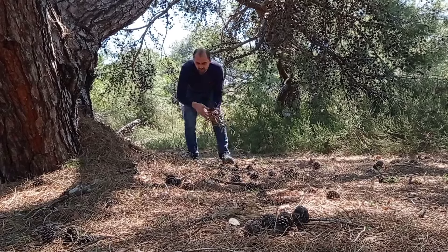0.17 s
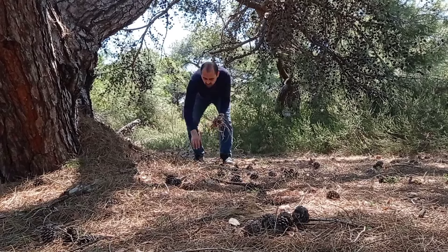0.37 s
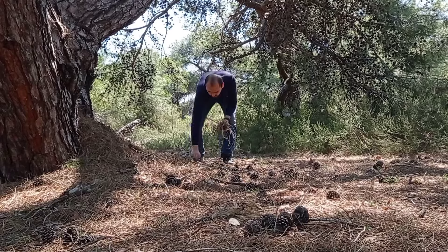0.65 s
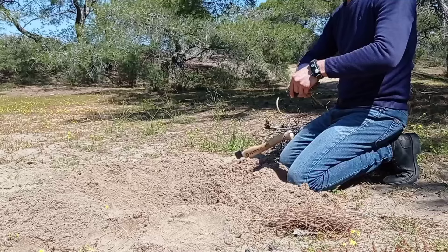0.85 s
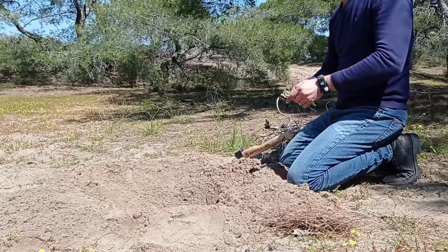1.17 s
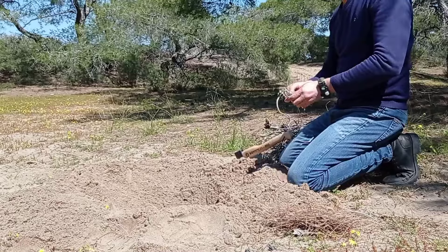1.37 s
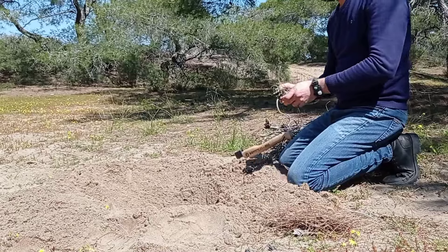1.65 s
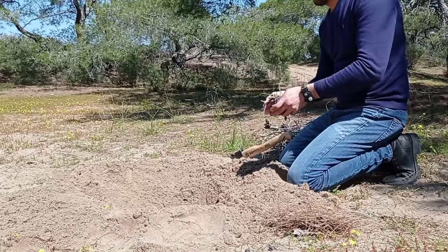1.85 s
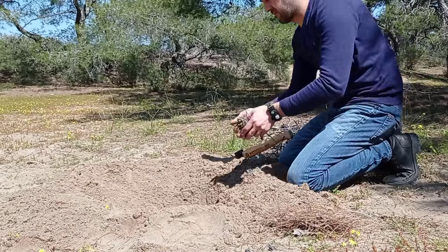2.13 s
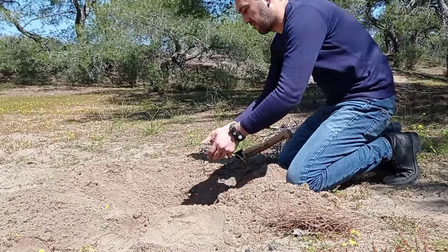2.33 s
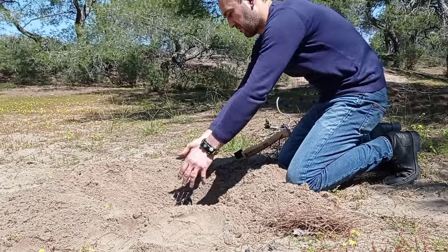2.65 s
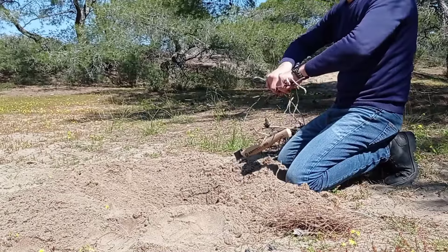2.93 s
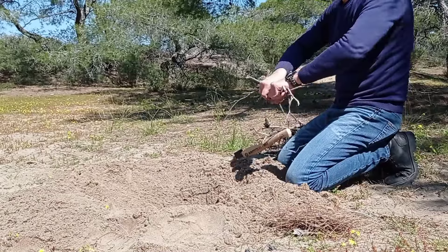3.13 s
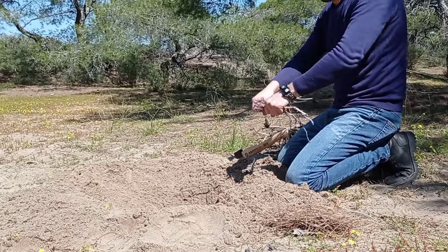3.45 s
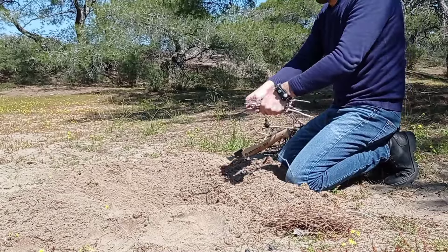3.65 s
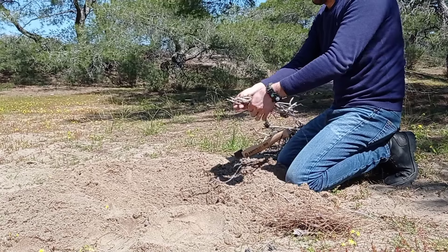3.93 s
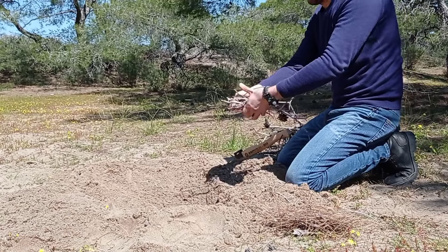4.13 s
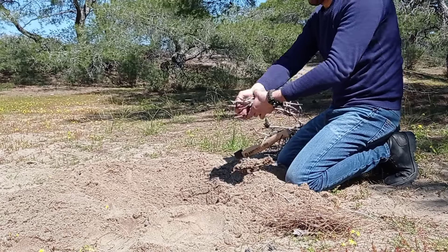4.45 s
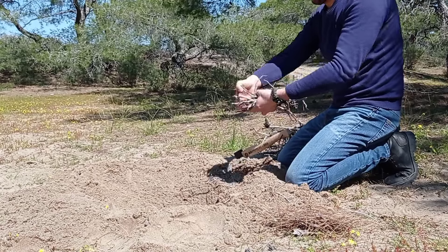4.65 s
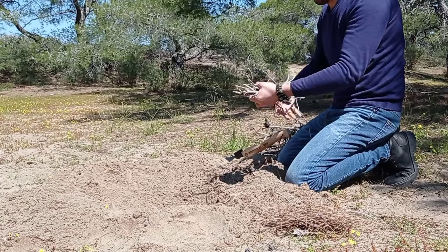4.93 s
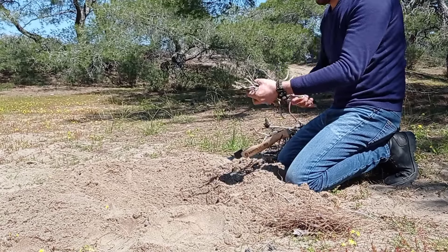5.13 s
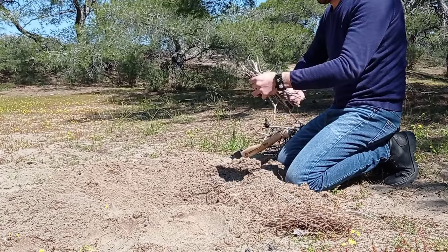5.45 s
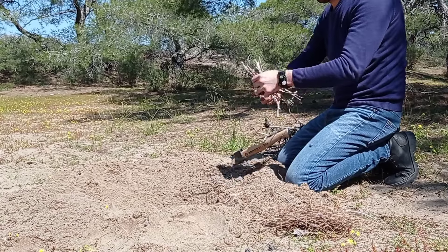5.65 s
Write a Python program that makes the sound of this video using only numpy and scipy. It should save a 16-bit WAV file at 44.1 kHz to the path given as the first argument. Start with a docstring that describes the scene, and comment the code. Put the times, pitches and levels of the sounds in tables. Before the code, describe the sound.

Outdoors among pines, hands crush dry twigs a few steps from the microphone. Faint ticks come first, then a cluster of snaps just after one second. A fly buzzes past near two seconds, then the loudest burst of bright cracks arrives just after three. Sparser crackles follow, with a late sharp snap. Low wind rumbles and thumps on the microphone throughout.

```python
"""Dry twigs and pine litter are crushed and snapped by hand in a wood, a few steps from the microphone.
Snaps are short noise bursts with a ringing piece; litter is a flurry of decaying sine clicks over a rustle.
A fly passes as a wavering tone with overtones. Wind buffets and thumps the microphone as filtered noise
and single pulses; the pines hum and far leaves hiss as patchy noise. Twice the sound drops out briefly."""
import sys
import numpy as np
from scipy import signal
from scipy.fft import rfft, irfft, next_fast_len
from scipy.io import wavfile
from scipy.ndimage import uniform_filter1d, map_coordinates

SR = 44100
rng = np.random.default_rng(int(sys.argv[2]) if len(sys.argv) > 2 else 0)


def persist_wave(psi):
    """Save psi, clipped to +-1, as 16-bit WAV."""
    counts = np.round(np.clip(psi, -1, 1) * 32767).astype(np.int16)
    wavfile.write(sys.argv[1], SR, np.atleast_2d(counts).T)


N = 255339


# the louder snaps of twigs; the three shares are relative to the crack:
# (time [s], crack level [dB], thick-wood knock [dB], stalk [dB], splinter fizz [dB], ringing piece [Hz])
LOUD_SNAPS = [(0.0385, -57, -21, -16, -16, 6940), (0.1926, -48.5, -13.5, -7, -7, 6500),
              (0.221, -50.5, -16.5, -10.5, -3, 6120), (0.4654, -63.5, -10.0, -6, 8, 7350),
              (0.4855, -50, -5.5, -2, -12, 7350), (0.7495, -48, -25.5, -20, -10, 5880),
              (0.7654, -56, -7, -6, -2, 4950), (0.9495, -54.5, -32, -19, -11, 6800),
              (0.9711, -51.5, -12, -8, -0.5, 6560), (1.0229, -32, 0.5, 5, -4.5, 2520),
              (1.0332, -42, -4, 1.5, -1, 4290), (1.045, -33.5, -21, -5, -10, 6740.0),
              (1.058, -39.5, -10.5, -8.0, 0, 6610), (1.109, -61, -17, 8, 2, 4880),
              (1.142, -36.5, 9.5, 5.5, 2.0, 2100), (1.16, -29.5, -5.5, 2, -2.0, 2570),
              (1.1892, -30.5, -9, 1, -5, 5040), (1.203, -42, -25, 2, 0.5, 5100.0),
              (1.228, -51, -17.5, 4, -9, 5550), (1.2416, -47, -5, 3.5, -10, 5530),
              (1.2975, -64, -16, 4.5, -11, 5270), (1.368, -57, -18.5, -12.5, 1, 6560),
              (1.4095, -44.5, -26.0, -14.0, -6, 5790), (1.4562, -48.5, -6.5, -2.5, -15, 4160),
              (1.5007, -36.5, -25, -19, -4.5, 6580), (1.5171, -54, -16, -4.5, -3.5, 5700),
              (1.5273, -48, -26, -5, -5, 5000), (1.5441, -46, -23, -18.5, -4.5, 6200),
              (1.588, -42, -32.5, 2.5, -13.0, 4700), (1.6555, -43.0, -30, -18, -4.5, 6430),
              (1.6912, -46.5, -14, -9, -14, 6360.0), (1.7703, -49.5, -21, 1.5, -10, 5600),
              (1.7874, -52, -9, -2, -13, 4810), (1.845, -47, -11, -19, -11, 6740),
              (1.8887, -57, -3.5, 5.5, -18.5, 6170), (1.9038, -46, -11.5, -2, -10, 6940),
              (1.954, -45.5, -7, -17, -16, 6200), (2.081, -53.5, -26, -22, -17, 7090),
              (2.7534, -42.5, -9, -9.5, -4, 5970), (2.7657, -48, -6, 2.5, -5, 6500),
              (2.7753, -30.5, -4, 2.5, -2.5, 6180), (2.819, -45, -8, -1.5, -16, 6920),
              (2.8368, -34.0, -7.5, 3, -6.5, 6660), (2.9015, -39.5, -16.5, -6, -7, 4240),
              (2.932, -37.5, -8, -11, 0, 7580), (2.9426, -34, -17, 0, -4, 6460),
              (2.9506, -37, 1.5, 5.5, 0, 2970), (3.0105, -48, -26, -13, 0.5, 7800),
              (3.033, -36, -14.5, -11, -3.0, 6700), (3.0546, -52.0, -7, -4.5, -11.0, 7040.0),
              (3.1034, -30, -14, -4, -10.0, 6490), (3.1198, -46, -16, -3, -14.5, 6940),
              (3.135, -23, -10.5, 1, -4, 3930), (3.1614, -34, -17, 2.5, -6, 4350),
              (3.1811, -25.5, -11, -3, 0, 7240), (3.19, -34.0, -24, -12, -8.5, 6530),
              (3.2032, -49, -18.0, -8.5, -3.5, 6700.0), (3.2207, -25.5, -13, -10, -16.5, 6860),
              (3.2274, -20.5, -14, -6.5, -4.5, 6560), (3.2328, -31, -13, -4, -6, 6600),
              (3.2473, -35.5, -13.5, -13.0, 4.5, 6700), (3.269, -22.5, -9.5, -1, -7.5, 7420),
              (3.3058, -25, -9, -2.5, -4.0, 6230.0), (3.3312, -28.5, -9.5, -21, -5, 6720),
              (3.3442, -30.0, -3, -5, -6, 5880.0), (3.3533, -28, -13, 1, -13, 6680.0),
              (3.3615, -36, -13.0, -5.5, -5.5, 7500), (3.3824, -17, -3, 4, -1.5, 7170),
              (3.4373, -35, -7, 0, -13, 6640), (3.4775, -58, -14, 1, -10, 5620),
              (3.5855, -65, 9.5, 8.5, -17, 2110), (3.6182, -48.5, -16, -3, -9, 5800.0),
              (3.629, -27.5, -5.5, -8, -8, 6360), (3.6392, -37.5, -4.0, 3.5, 0.5, 4060),
              (3.6623, -59.5, 8, 4, -12.0, 2580.0), (3.7167, -55, -14, 1, -12, 4580),
              (3.742, -50, -12, 1.5, -18, 4380), (3.7616, -59.5, -1.5, 8, 0, 2930),
              (3.874, -45.5, -34, -12, -5.5, 5230), (3.8814, -45.5, -21, -5, -12, 5300),
              (3.9622, -37, -33, -14, -5.0, 5290.0), (3.968, -41, -21, -1, -18, 6430),
              (3.9838, -34.5, -5, -11, -5.5, 6530), (3.9907, -31.5, -20, -7, -11, 6760),
              (4.038, -51, -9.5, 3, -0.5, 6180), (4.0513, -38, -14.5, -12, 0, 6050),
              (4.072, -33.0, -10.5, -14, -5, 6060), (4.1607, -39.5, -23, -19, -1, 6560),
              (4.2046, -57, -19, -7.5, -11, 6740), (4.336, -49.5, -14, -11.5, -0.5, 6800),
              (4.3838, -37.5, -10, -14, -8.5, 5280), (4.4203, -59, -13, 1, -17.0, 4920),
              (4.4574, -42.5, -21, 2, -1, 4960), (4.5184, -46.0, -12.0, -5.5, -20, 6130.0),
              (4.5286, -42.5, -15, -7.0, -5.5, 7120), (4.5474, -54, -6.5, -8, -20.5, 6470),
              (4.5691, -49, -20, 3.5, -12, 3540), (4.5789, -50, -22, -3, -6, 6500),
              (4.5909, -46.5, -16, -3, -14.5, 6500), (4.6983, -43, -23, -3, -13, 7520),
              (4.7076, -49.5, -13, -12.5, -17.5, 6730.0), (5.0088, -53.0, -20.0, -1, -18.5, 7100),
              (5.0907, -54, -10.5, -12, 1.5, 5960), (5.1144, -55.5, -18, -18, -15, 7670),
              (5.2001, -57.5, 8, 8.5, -0.5, 3090), (5.2116, -53.5, -4, 2, -12, 3810.0),
              (5.2654, -32, -12.5, -4, -5.5, 5360), (5.3166, -53, -3.0, 4, -15, 2440),
              (5.348, -43.5, -10, 1, -11, 6560), (5.379, -50, -28, -11.5, -1, 7230),
              (5.388, -46.5, -35, -14.5, 4, 7260), (5.4094, -25.5, -7.5, -35, -4, 5200),
              (5.4332, -37.5, -8.5, -10, -4.5, 1740.0), (5.6822, -51.5, -12, 3.5, -4.5, 5880),
              (5.7186, -49, -32, -11.0, -5, 5630.0), (5.7519, -38.5, -28, -3, -6.5, 4830),
              (5.7855, -41.5, -9, 1, 3, 4830)]
SNAP_T60_S, RING_T60_S, RING_DB = 0.014, 0.011, -3  # fibres tearing, the ringing piece


def snaps():
    """Each break is a sharp burst that dies in milliseconds and leaves one piece ringing at its own pitch."""
    t = np.arange(SR // 16) / SR
    tracks = np.zeros((4, N + len(t)))  # crack, knock, stalk, fizz
    rings = np.zeros(N + len(t))
    rise = 1 - np.exp(-(t / 0.00048) ** 2)
    crack_decay = amp(-60 * t / 0.0037)
    tearing_decay = 0.53 * amp(-60 * t / SNAP_T60_S)
    faint_tail = amp(-24.5 - 60 * t / 0.059)
    shape = rise * (crack_decay + tearing_decay + faint_tail)
    for s, db, knock_db, stalk_db, fizz_db, ring_hz in small_snaps() + list(LOUD_SNAPS):
        start = round(s * SR)
        burst = shape * rng.standard_normal(len(t))
        burst *= np.linalg.norm(shape) / np.linalg.norm(burst)  # each break has the strength of its row
        burst[round(0.0007 * SR)] += 1.64 * rng.choice([-1, 1])  # the fibres part in one instant
        shares_db = np.array([[0], [knock_db], [stalk_db], [fizz_db]])
        tracks[:, start:start + len(t)] += amp(db + shares_db) * burst
        # the piece rings as loud as the part of the wood its pitch belongs to
        part_db = knock_db if ring_hz < 2800 else stalk_db if ring_hz < 5000 else 0
        ring = amp(db + part_db + RING_DB - 60 * t / RING_T60_S) * np.sin(2 * np.pi * ring_hz * t)
        rings[start:start + len(t)] += rise * ring
    return wood(*tracks[:, :N]) + rings[:N]


# average shares of a small snap, relative to its crack: (knock [dB], stalk [dB], fizz [dB])
SMALL_SHARES = [-11.5, -4.5, -16]
SMALL_OVER_DB, SMALL_SPREAD_DB = 11, 1  # over the crackle they come from, random spread


def small_snaps(count=60):
    """Chance snaps come while the hand is busy, as rows like the louder ones."""
    level = grip()[0]
    busy = np.cumsum(np.sqrt(level) * (level > amp(-80)))
    draw = rng.standard_normal((count, 4))
    when, pitch = rng.random((count, 2)).T
    at = np.searchsorted(busy, when * busy[-1])
    db = np.minimum(20 * np.log10(level[at]) + SMALL_OVER_DB, -45) + SMALL_SPREAD_DB * draw[:, 0]
    shares_db = SMALL_SHARES + 5 * draw[:, 1:]
    ring_hz = 4200 + 3200 * pitch
    return list(np.column_stack([at / SR, db, shares_db, ring_hz]))


SMOOTH_DB, GRAINY_DB = -82.5, -65.5  # soft handling mostly rustles, hard squeezes click


def crackle(count=16000, size=192):
    """Needles and bark give way in flurries of tiny clicks over a patchy rustle of rubbing litter."""
    level, knock, stalk, fizz = grip()
    when, pitch, life, loud, turn = rng.random((count, 5)).T
    press_db = 4.5 * wobble(90) + 2.0 * wobble(250)  # the grip tightens and slips
    busy = np.cumsum(amp(press_db))
    start = np.searchsorted(busy, when * busy[-1])
    hz = (900 + (16000 - 900) * pitch)[:, None]
    t60 = (0.001 * 5 ** life)[:, None]  # 1 to 5 ms
    t = np.arange(size) / SR
    click_db = -3 * np.log(loud + 0.003)[:, None]  # many faint, few loud
    envelope = amp(click_db - 60 * t / t60) * (1 - np.exp(-t / 0.0002))
    rows = envelope * np.sin(2 * np.pi * (hz * t + turn[:, None]))
    places = start[:, None] + np.arange(size)
    clicks = np.bincount(places.ravel(), rows.ravel(), N + size)[:N]
    hard = np.clip((20 * np.log10(level) - SMOOTH_DB) / (GRAINY_DB - SMOOTH_DB), 0.2, 1)
    rustle = amp(0.6 * hard * press_db) * rng.standard_normal(N)
    mix = hard * unit(clicks) + np.sqrt(1.5 - hard ** 2) * unit(rustle)
    litter = patchy(mix, depth_db=3.0)
    return wood(level * litter, knock * litter, stalk * litter, fizz * litter)


# squeezes of the hand and steps on litter; the three shares are relative to the crackle:
# (start [s], hold [s], crackle level [dB], thick wood [dB], stalk [dB], splinter [dB])
HAND_SQUEEZES = [(0.014, 0.04, -68.5, -11.5, -14, -6.5), (.11, 0.23, -72.5, -15.5, -2, -30),
                 (0.473, .05, -72.5, -12, -8, -28), (0.602, 0.057, -80, -23, -17.5, -19),
                 (.7, 0.055, -73, -26, -18, -18), (0.802, 0.028, -72.5, -31, -14, -24),
                 (0.878, .03, -73, -21.5, -15, -8.5), (0.975, 0.0046, -74, -8, -11, -6),
                 (1.049, 0.01, -60.5, -15, 0.5, -3), (1.127, 0.033, -69, -23, -7, -6),
                 (1.144, .09, -60, -8, -1.5, -6.5), (1.37, 0.043, -66.5, -10.5, -15, -8.5),
                 (1.459, .18, -69, -14, -1, -5.5), (1.685, 0.041, -66, -8, 2, -8),
                 (1.774, 0.09, -76, -10.5, -4, -13), (1.886, .09, -70.5, -7, 0, -11),
                 (2.08, 0.092, -79, -3, 4, -13), (2.769, 0.023, -57.5, -5.5, -10.5, -3.5),
                 (2.838, 0.036, -67, -7, -4, -13), (2.911, 0.062, -67.5, -11, -3, -6.5),
                 (3.026, 0.025, -70.5, -12, -3, -4.5), (3.13, 0.052, -62, -8, -11, -5.5),
                 (3.223, 0.061, -56, -14.5, -5, -6.5), (3.303, 0.03, -61.5, -14, -3, -5),
                 (3.399, 0.016, -46, -8, 0, -6), (3.424, 0.037, -57, -8.5, -7, -11),
                 (3.49, .04, -68.5, -15, -2, 2), (3.578, 0.017, -75, -3, -3, -7),
                 (3.634, 0.013, -62.5, -4, 0.5, -6), (3.747, 0.04, -69, -7, -2.5, -7),
                 (3.881, 0.011, -63, -16, -3, -11.5), (3.982, 0.065, -56, -8, -3, -7),
                 (4.148, 0.068, -72, -9.5, -13.5, -21.5), (4.326, 0.042, -71, -11.5, -2.5, -5.5),
                 (4.391, .04, -66, -6.5, 1, -8), (4.459, .07, -62, -6.5, -1, -12),
                 (4.55, .05, -65, -9, -0.5, -8), (4.689, 0.02, -67.5, -7.5, 1, -4.5),
                 (4.959, .07, -76, -20.5, -22.5, 1), (5.098, 0.027, -74.5, -12, -7, -8.5),
                 (5.201, 0.0071, -73, -10, -5, -5), (5.278, 0.044, -68, -5, -8, -5),
                 (5.42, 0.01, -54.5, -13.5, -9.5, -6.5), (5.546, 0.082, -71.5, -18, -5, -11),
                 (5.65, 0.42, -71, -10, 2.5, -7.5)]
GRIP_DB_PER_S, SETTLE_DB_PER_S = 600.5, 300  # a squeeze swells fast and settles slower
REST_DB, REST_FIZZ_DB = -93, -15  # litter left alone, its splinter share


def grip():
    """Each squeeze swells, holds and settles: gains of the crackle, its thick wood, stalks and splinters."""
    start, hold, db, knock_db, stalk_db, fizz_db = np.transpose(HAND_SQUEEZES)[:, :, None]
    t = np.arange(0, N + 64, 64) / SR
    swell_db = GRIP_DB_PER_S * np.clip(start - t, 0, None)
    settle_db = SETTLE_DB_PER_S * np.clip(t - start - hold, 0, None)
    each = amp(db - swell_db - settle_db)
    parts = [(0, 0), (knock_db, 0), (stalk_db, 0), (fizz_db, REST_FIZZ_DB)]
    sums = [amp(REST_DB + rest_db) + (each * amp(share_db)).sum(0) for share_db, rest_db in parts]
    return [np.interp(np.arange(N) / SR, t, gain) for gain in sums]


# colour of breaking wood through the microphone: (frequency [Hz], relative level [dB per Hz])
WOOD_COLOUR = [(470, -62), (800, -20), (886, -11), (981, -30), (1140, -20), (1720, -14), (2030, -11),
               (3090, -11), (3840, -3.5), (5280, 2), (7170, 8.5), (12200, -17.5), (13600, -26.5),
               (15000, -9.5), (16800, -29.5)]


def wood(crack, knock, stalk, fizz):
    """Thick wood sounds low, thinner stalks above it, then the break itself, and splinters on top."""
    low = coloured(knock, lambda f: along(WOOD_COLOUR, f) * above(f, 1176) * below(f, 2810))
    mid = coloured(stalk, lambda f: along(WOOD_COLOUR, f) * above(f, 3780) * below(f, 5210))
    high = coloured(crack, lambda f: along(WOOD_COLOUR, f) * above(f, 5126) * below(f, 8740))
    top = coloured(fizz, lambda f: along(WOOD_COLOUR, f) * above(f, 8770))
    return low + mid + high + top


WING_HZ, FLY_DB = 239.4, -52  # mean wingbeat, its mean level when nearest
NEAREST_S, NEAREST_M, COMING_M_PER_S, LEAVING_M_PER_S = 1.99, 0.14, 0.96, 2.4
TAKE_OFF_S, LANDS_S = 1.165, 2.25  # the wings start and stop


def fly():
    """Wingbeats: a slightly unsteady tone with a strong octave, fading with distance."""
    s = np.arange(N) / SR - NEAREST_S
    speed = np.where(s < 0, COMING_M_PER_S, LEAVING_M_PER_S)
    metres = np.hypot(NEAREST_M, speed * s)
    turn = 2 * np.pi * np.cumsum(WING_HZ * (1 + 0.0035 * wobble(20))) / SR
    tone = np.sin(turn) + amp(-2) * np.sin(2 * turn) + amp(-28) * np.sin(3 * turn)
    since_start = s + NEAREST_S - TAKE_OFF_S
    until_stop = LANDS_S - NEAREST_S - s
    flying = np.clip(np.minimum(since_start, until_stop) / 0.045, 0, 1)
    return flying * amp(FLY_DB + 4.5 * wobble(11.8)) * NEAREST_M / metres * tone


# single thumps of air on the microphone; the pulse plays 6 dB under its level, its swing at 0.93 of its rate:
# (time [s], level [dB], pulse rate [Hz])
AIR_THUMPS = [(0.0858, -28.5, 119), (0.194, -38.5, 136), (0.3126, -36, 215), (0.4169, -26.5, 188.5),
              (0.4473, -33, 126.4), (0.734, -45, 122), (1.3146, -35.5, 108), (1.4382, -51, 179),
              (1.529, -40, 159), (1.6954, -37.5, 196), (1.7931, -35, 150.4), (2.098, -31, 179),
              (2.173, -31, 109.5), (2.2069, -28.5, 175.5), (2.277, -33, 190), (2.3237, -31, 170),
              (2.399, -31, 154.4), (2.6589, -32, 112), (2.8027, -41, 75), (2.8192, -35, 167.7),
              (3.955, -23, 148.5), (4.0023, -25, 237), (4.032, -31.5, 131), (4.043, -30, 101),
              (4.0705, -34, 149), (4.5346, -38, 130.7), (4.8023, -42, 181), (5.0515, -26.5, 135),
              (5.1607, -33.5, 220), (5.19, -37.5, 260), (5.261, -29, 157), (5.2972, -27, 153)]


def thumps():
    """A single eddy pushes or pulls the diaphragm, which swings back on both sides of the pulse."""
    half = SR // 40
    t = np.arange(-half, half) / SR
    out = np.zeros(N)
    for s, db, hz in AIR_THUMPS:
        u = t * hz
        swing = np.exp(-(u / 0.66) ** 2) * np.cos(2 * np.pi * 0.93 * u)
        edge = 1.39 * np.exp(-(u / 0.17) ** 2)  # the steep front of the eddy
        start = round(s * SR) - half - 1
        out[start:start + len(t)] += rng.choice([-1, 1]) * amp(db - 6.0) * (swing + edge)
    return signal.sosfiltfilt(signal.butter(2, 60, "high", fs=SR, output="sos"), out)


# wind on the microphone: (time [s], buffeting level [dB], upper rumble level [dB])
WIND_LEVELS = [(0.0, -47, -67.5), (0.11, -45.5, -68.5), (0.39, -48.5, -73), (0.42, -41, -72),
               (0.69, -49.5, -81), (0.74, -46, -76), (0.77, -59, -76.5), (1.51, -49.5, -60.5),
               (1.93, -54, -47), (2.19, -39.5, -48), (2.26, -44, -56), (2.64, -45, -55), (2.76, -69.5, -60),
               (2.82, -44, -65), (2.85, -54, -65), (3.11, -51.5, -64), (3.16, -61.5, -67.5),
               (3.66, -55, -64.5), (3.87, -61.5, -78.5), (3.95, -43.5, -70), (4.18, -54, -73.5),
               (4.55, -50, -73.5), (4.76, -60, -77.5), (4.85, -46, -73), (5.01, -50.5, -73.5),
               (5.05, -46.5, -72), (5.1, -49.5, -69.5), (5.26, -45.5, -60.5), (5.6, -54, -71.5),
               (5.79, -59, -71)]
# colour of wind on the microphone: (frequency [Hz], relative level [dB per Hz])
BUFFET_COLOUR = [(12, -55.5), (20, -37.5), (73, 2), (119, 0), (186, -7), (392, -21), (483, -18.5),
                 (528, -41), (700, -35.5), (910, -66.5), (1540, -120)]


def wind():
    """Eddies buffet the microphone in lumps; an upper rumble rises and falls on its own curve."""
    level_db, upper_db = curves(WIND_LEVELS)
    low = coloured(rng.standard_normal(N), lambda f: along(BUFFET_COLOUR, f) * below(f, 186))
    high = coloured(rng.standard_normal(N), lambda f: along(BUFFET_COLOUR, f) * above(f, 204.6))
    lumps_db = 1.5 * wobble(25) + 1.6 * wobble(9)
    buffeting = unit(amp(lumps_db) * low)
    rumble = unit(amp(lumps_db + 2.5 * wobble(40)) * high)
    return amp(level_db) * buffeting + amp(upper_db) * rumble


# hum of the pine crowns, before its random waver: (time [s], level [dB])
CROWN_HUM = [(0.0, -67), (0.32, -66.5), (0.85, -71), (2.11, -62.5), (3.05, -73.5), (3.55, -68.5),
             (4.11, -77.5), (5.31, -75.5), (5.79, -80)]
# colour of the hum: (frequency [Hz], relative level [dB per Hz])
PINE_COLOUR = [(150, -28.5), (250, -2.5), (313, -5), (401, -8.5), (484, -2.5), (633, -1.5), (986, -22),
               (1500, -47.5), (1950, -53), (3300, -120)]
# colour of far leaves and microphone hiss: (frequency [Hz], relative level [dB per Hz])
AIR_COLOUR = [(530, -12.5), (900, -9), (981, -6), (1370, -11.5), (1640, -14.5), (2260, -24.5),
              (4430, -24.5), (6240, -16), (9820, -34), (15300, -34.5), (16800, -29)]
AIR_DB = -83


def wood_air():
    """The pines hum low in the wind; far leaves hiss faintly, both as patchy filtered noise."""
    hum = coloured(patchy(rng.standard_normal(N), depth_db=3.0), lambda f: along(PINE_COLOUR, f))
    hiss = coloured(patchy(rng.standard_normal(N), depth_db=4.0), lambda f: along(AIR_COLOUR, f))
    hum_db = curves(CROWN_HUM)[0] + 2.3 * wobble(26)
    return amp(hum_db) * hum + amp(AIR_DB) * hiss


def amp(db):
    """Gain of a level in dB."""
    return 10 ** (np.asarray(db) / 20)


def unit(x):
    """x at rms 1."""
    return x / np.sqrt(np.mean(x ** 2) + 1e-20)


def along(points, hz):
    """Gain of (Hz, dB) points on a log axis."""
    f, db = np.transpose(points)
    return amp(np.interp(np.log(hz + 1), np.log(f + 1), db))


def curves(rows):
    """One value per sample for each column after the time."""
    s, *columns = np.transpose(rows)
    return [np.interp(np.arange(N) / SR, s, c) for c in columns]


def wobble(rate):
    """A smooth random curve, rate knots a second."""
    knots = rng.standard_normal(int(N * rate / SR) + 4)
    return map_coordinates(knots, [np.arange(N) * rate / SR])


def coloured(x, gain):
    """x through a causal filter of the given gain per frequency that keeps the power of white noise."""
    m = 2 * next_fast_len(N // 2 + 4096)
    g = gain(np.fft.rfftfreq(m, 1 / SR))
    # folding the cepstrum gives minimum phase, so nothing sounds before its cause
    ceps = irfft(np.log(g / np.sqrt(np.mean(g ** 2)) + 1e-6), m)
    ceps[1:m // 2] *= 2
    ceps[m // 2 + 1:] = 0
    return irfft(rfft(x, m) * np.exp(rfft(ceps)), m)[:N]


def above(hz, edge_hz):
    """Gain of a fourth-order slope that passes what lies above an edge."""
    return 1 / np.sqrt(1 + (edge_hz / (hz + 1)) ** 8)


def below(hz, edge_hz):
    """Gain of a fourth-order slope that passes what lies below an edge."""
    return 1 / np.sqrt(1 + (hz / (edge_hz + 1)) ** 8)


def patchy(x, depth_db):
    """x at rms 1 with random louder and softer patches in pitch and time."""
    z = signal.stft(x, nperseg=256)[2]
    field = uniform_filter1d(rng.standard_normal(z.shape), size=4, axis=0)
    field = uniform_filter1d(field, size=10, axis=1)
    return unit(signal.istft(z * amp(depth_db * unit(field)), nperseg=256)[1][:N])


def scene():
    """All sources add up at one microphone."""
    return (snaps() + crackle() + fly() + thumps() + wind() + wood_air())[None]


DROPOUTS_S, DROPOUT_WIDTH_S = [0.7605, 2.761], 0.0034
TOP_HZ = 16900


def record(dry):
    """The sound drops out for an instant at two moments; nothing above the band limit is kept."""
    t = np.arange(N) / SR
    gates = [1 - np.exp(-((t - s) / DROPOUT_WIDTH_S) ** 4) for s in DROPOUTS_S]
    gated = dry * np.prod(gates, axis=0)
    m = next_fast_len(N + 4096)
    in_band = np.fft.rfftfreq(m, 1 / SR) < TOP_HZ
    return irfft(rfft(gated, m) * in_band, m)[:, :N]


dry = scene()
out = record(dry)
persist_wave(out)
```